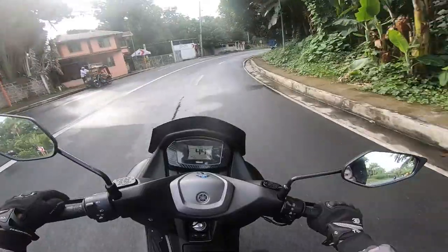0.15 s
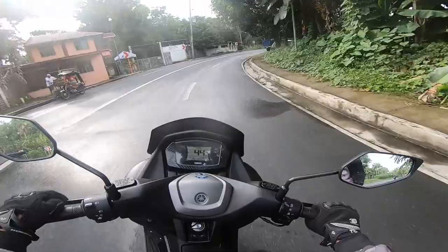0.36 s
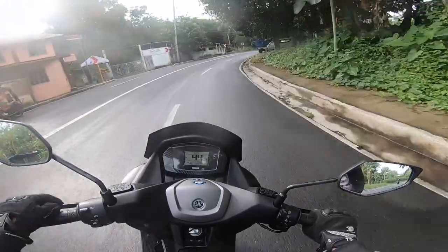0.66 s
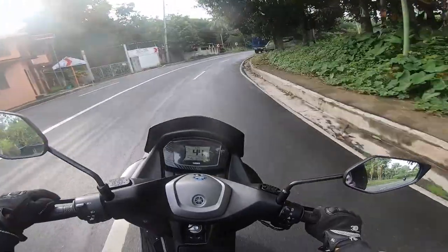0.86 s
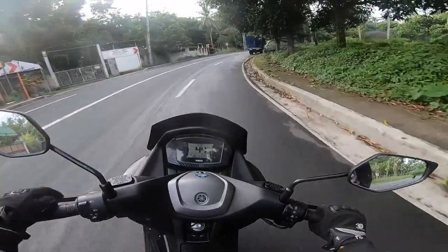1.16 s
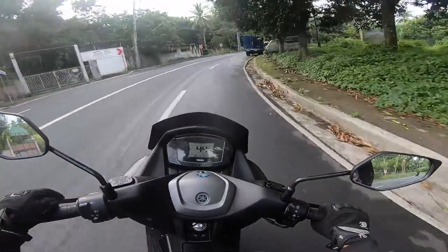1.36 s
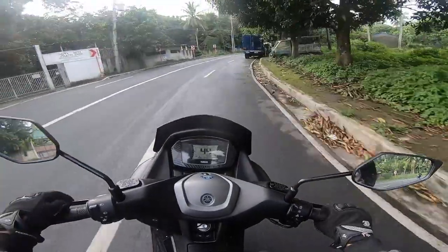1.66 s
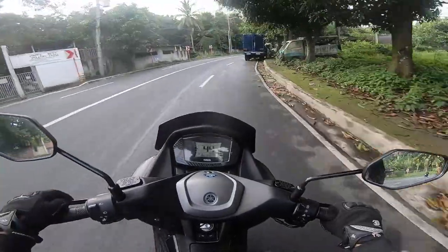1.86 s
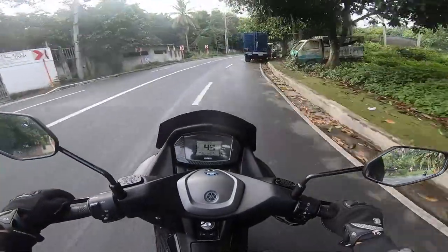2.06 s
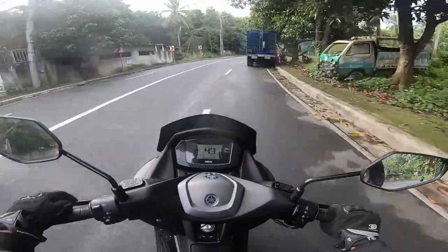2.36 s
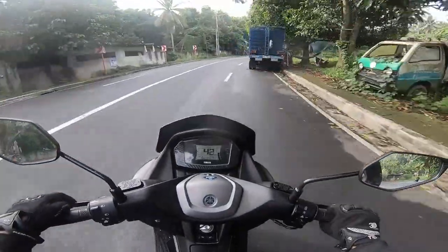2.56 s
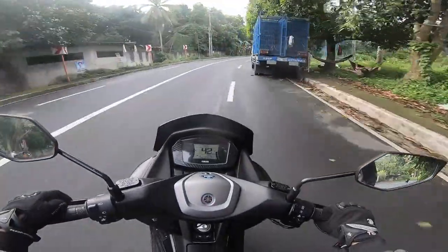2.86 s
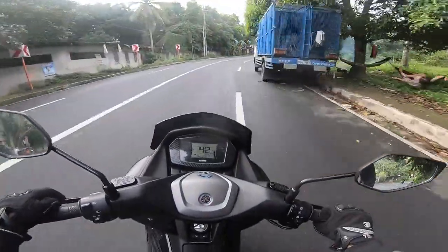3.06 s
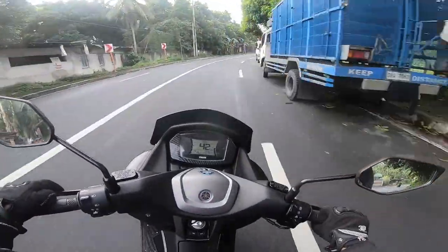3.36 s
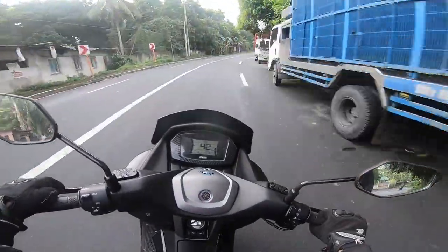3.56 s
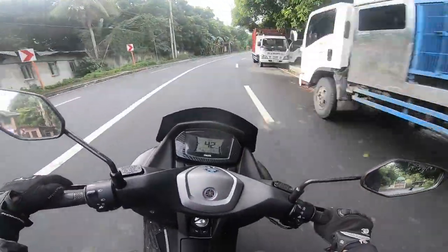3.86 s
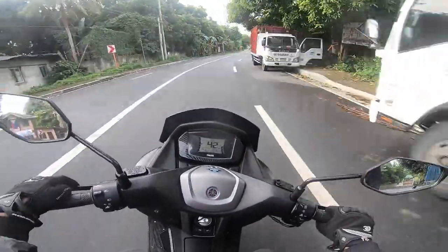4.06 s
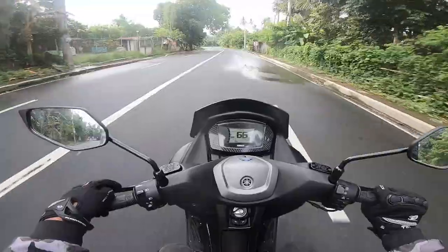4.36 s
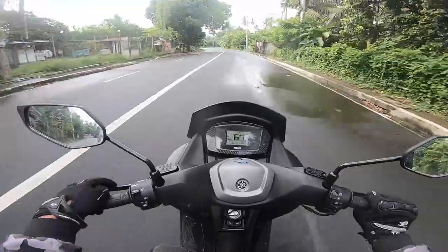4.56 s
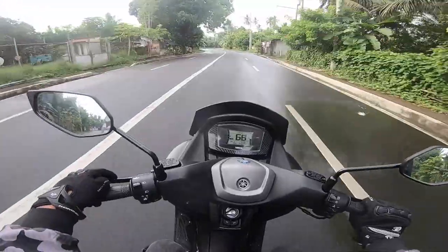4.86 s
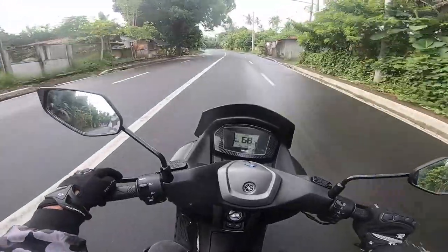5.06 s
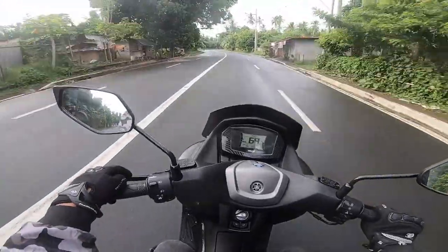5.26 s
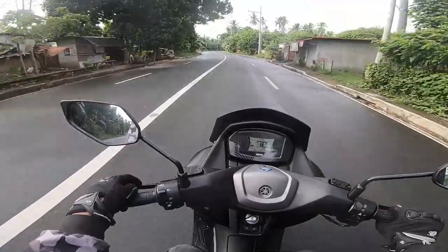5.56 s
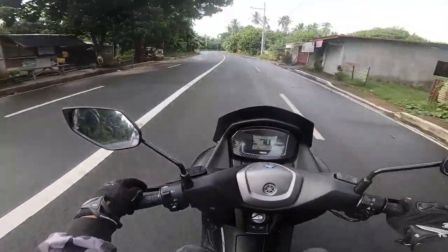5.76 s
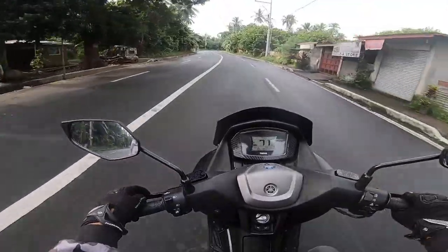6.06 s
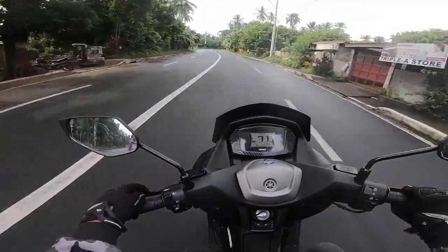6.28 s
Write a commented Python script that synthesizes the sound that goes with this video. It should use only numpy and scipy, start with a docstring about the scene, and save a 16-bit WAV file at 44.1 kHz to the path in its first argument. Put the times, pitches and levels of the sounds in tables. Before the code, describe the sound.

Heard from the rider's chest, a single-cylinder scooter cruises on a damp road: low buzzing drone, dull tyre roar and wind thumping the microphone. Faint ticks and a little spray come early, then four short bird whistles. A hollow whoosh marks a parked lorry going by, and the engine lifts slightly. A sharp click cuts to a faster stretch with higher drone, louder roar, airy hiss and heavy buffeting.

```python
"""A single-cylinder scooter on a damp road, heard from the rider's chest: drone, tyre roar, wind buffets.
Cruising: soft high ticks, spray on a wet patch at 0.8 s, four bird calls from 2.3 s, a parked lorry's
whoosh at 3.8 s, then slightly more throttle. At 4.35 s a click jumps to a faster, louder stretch;
its throttle eases from 5.7 s. The engine is a sum of harmonics of the firing rate, the bird is
gliding sines, and tyres, wind and air are shaped noise."""
import sys
import numpy as np
from scipy import signal
from scipy.fft import rfft, irfft, next_fast_len
from scipy.io import wavfile
from scipy.ndimage import uniform_filter1d

SR = 44100
rng = np.random.default_rng(int(sys.argv[2]) if len(sys.argv) > 2 else 0)


def wrap_up_sound(samples):
    """Save the sound to the file named by the first command line argument, as 16-bit audio."""
    columns = np.atleast_2d(samples).T
    # keep every value between -1 and 1, then stretch to whole-number steps
    tamed = np.clip(columns, -1, 1)
    steps = np.round(tamed * 32767).astype(np.int16)
    wavfile.write(sys.argv[1], SR, steps)


N = 283122
T = np.arange(N) / SR
JUMP_S = 4.3499
LORRY_S = 3.79


def undb(db):
    """Decibels to gain."""
    return 10 ** (np.asarray(db) / 20)


def curve(rows):
    """Join (t/s, value) rows by straight lines."""
    return np.interp(T, *np.transpose(rows))


def ramp(from_s, to_s):
    """Straight rise from 0 to 1 between two times."""
    return np.clip((T - from_s) / (to_s - from_s), 0, 1)


def swell(at_s, rise_s, fall_s):
    """Gaussian rise to 1 at at_s and Gaussian fall after; rise_s and fall_s are 1/e times."""
    return np.exp(-((T - at_s) / np.where(T < at_s, rise_s, fall_s)) ** 2)


def unit(x):
    """Scale to rms 1."""
    return x / np.sqrt(np.mean(x ** 2))


def walk(rate_hz):
    """Smooth random wandering of rms 1: noise low-passed at about rate_hz."""
    size = next_fast_len(N, real=True)
    hz = np.arange(size // 2 + 1) * SR / size
    spectrum = rfft(rng.standard_normal(size)) / (1 + (hz / rate_hz) ** 4)
    return unit(irfft(spectrum, size)[:N])


def colour(x, points):
    """Filter x by a response of (f/Hz, level/dB) points, linear over log frequency; rms 1."""
    hz, db = np.transpose(points)
    bins_hz = np.arange(N // 2 + 1) * SR / N + 1  # +1 avoids log(0)
    gain = undb(np.interp(np.log(bins_hz), np.log(hz), db))
    return unit(irfft(rfft(x) * gain, N))


def hiss(centre_hz, width_hz):
    """Noise in a bell-shaped band, rms 1."""
    bins_hz = np.arange(N // 2 + 1) * SR / N
    bell = np.exp(-((bins_hz - centre_hz) / width_hz) ** 2)
    return unit(irfft(rfft(rng.standard_normal(N)) * bell, N))


def engine(revs, cycles, orders, change, load_db, shimmer_db, rough, drift_turns):
    """Wavering firing-rate harmonics, lifted by resonances and shut in above an edge by the bodywork.

    change (0-1) moves each harmonic from its first level to its second.
    """
    # resonances of airbox and a body panel: centre f/Hz, width/Hz, extra gain at centre (ratio)
    resonance_rows = [(450, 37, 0.7), (1416, 30, 0.96)]
    body_edge_hz = 1566
    firing_hz = curve(revs)
    out = 0
    for order, first_db, second_db in orders:
        tone_hz = order * firing_hz
        db = first_db + change * (second_db - first_db) + shimmer_db * np.tanh(walk(4.4))
        lift = 1 + sum(gain / (1 + (2 * (tone_hz - centre_hz) / width_hz) ** 2)
                       for centre_hz, width_hz, gain in resonance_rows)
        shield = 1 / np.sqrt(1 + (tone_hz / body_edge_hz) ** 60)
        turns = order * cycles + rng.random() + drift_turns * walk(5)
        out = out + lift * shield * undb(db) * np.sin(2 * np.pi * turns)
    return out * undb(load_db) * (1 + rough * walk(40))


def crank(revs, wobble):
    """Running count of firing cycles; the speed wavers slightly under the belt drive."""
    return np.cumsum(curve(revs) * (1 + wobble * walk(9.5))) / SR


def throttle(revs):
    """Firing rate above its mean over the stretch, Hz."""
    hz = curve(revs)
    in_stretch = (T >= revs[0][0]) & (T <= revs[-1][0])
    return hz - hz[in_stretch].mean()


def road(cycles, roar_db, spectrum, firing_depth, turn_depth, flutter_db, clatter_hz=2000):
    """Tyre and air roar plus dull engine clatter that pulses at each firing and each crank turn."""
    # four-stroke: two crank turns per firing
    pulsing = firing_depth * np.cos(2 * np.pi * cycles) + turn_depth * np.cos(4 * np.pi * cycles)
    rush = rng.standard_normal(N) * undb(flutter_db * walk(25))
    bins_hz = np.arange(N // 2 + 1) * SR / N
    clatter = irfft(rfft(rush * pulsing) / (1 + (bins_hz / clatter_hz) ** 2), N)
    return colour(rush + clatter, spectrum) * undb(roar_db)


def spray(grain_db=3, centre_hz=6500, width_hz=2800):
    """Fine droplets thrown off the tyres on a wet patch: grainy high noise."""
    wet_s, wet_half_s, spray_db = 0.83, 0.31, -68.5
    droplets = unit(hiss(centre_hz, width_hz) * undb(grain_db * walk(300)))
    return droplets * undb(spray_db) * swell(wet_s, wet_half_s, wet_half_s)


def wind(gust_rows, flutter_rows):
    """Large eddies thump on the microphone with each gust; small ones keep up a dense flutter."""
    # large-eddy spectrum: f/Hz, relative level/dB per Hz
    rumble_spectrum = [(4, -15.5), (15, 1), (27, 1.5), (50, -3.5), (70, -12), (120, -27.5), (500, -71),
                       (5000, -140)]
    # small-eddy spectrum: f/Hz, relative level/dB per Hz
    flutter_spectrum = [(30, -25), (60, -3), (85, 0), (135, -5.5), (190, -10.5), (250, -13.5), (500, -40.5),
                        (1200, -34), (3000, -84.5), (8000, -120)]
    rumble = eddies(rumble_spectrum, even_s=0.12, lumpy_db=0.3) * undb(curve(gust_rows))
    flutter = eddies(flutter_spectrum, even_s=0.13, lumpy_db=1.0) * undb(curve(flutter_rows))
    return rumble + flutter


def eddies(spectrum, even_s, lumpy_db):
    """Eddies of varying strength as shaped noise, with power evened out over about even_s."""
    x = colour(rng.standard_normal(N) * undb(lumpy_db * np.tanh(walk(35))), spectrum)
    size = int(even_s * SR)
    power = uniform_filter1d(uniform_filter1d(x ** 2, size), size)
    return unit(x / np.sqrt(power))


def fairing(level_db=-45.0, centre_hz=2330, width_hz=470, full_s=4.9, gust_db=-0.5):
    """Air hisses over the fairing: band noise that builds up after the jump and swells gently."""
    level = undb(level_db + gust_db * np.tanh(walk(3.4)))
    return hiss(centre_hz, width_hz) * ramp(JUMP_S, full_s) * level


def lorry(centre_hz=815, width_hz=110, half_s=0.11, level_db=-40.5):
    """Brief hollow whoosh, a band of noise, as the side of the parked lorry goes by."""
    return hiss(centre_hz, width_hz) * undb(level_db) * swell(LORRY_S, half_s, half_s)


def bird(third_db=-13, bright_s=0.023, fourth_db=-29, second_ratio=1.253, second_at_s=0.064,
         second_half_s=0.026, waver=0.0041, tremble_db=1.0):
    """Whistles on the voice's second harmonic scoop up, sag and drop; the other syrinx side joins higher."""
    # calls: start t/s, length/s, attack/s, top pitch f/Hz, sag/Hz, final drop/Hz, mid-call lilt/Hz,
    # initial level/dB, second voice relative to first/dB
    call_rows = [(2.306, 0.128, 0.045, 3120, 170, 200, 2, -48.5, -35),
                 (2.556, 0.115, .02, 3280, 200, 330, 2, -46, -28),
                 (2.79, 0.12, 0.017, 3265, 60, 440, 63, -44.7, -13.5),
                 (3.041, 0.11, .014, 3240, 213, 230, 10, -45, -11.5)]
    release_s, fade_db_per_s = 0.023, 20
    scoop_hz, scoop_s, drop_s = 146.6, 0.019, 0.0354
    overshoot_hz, bump_s = 75, 0.013
    out = 0
    unsteady = 1 + waver * walk(124)
    for start_s, length_s, attack_s, top_hz, sag_hz, drop_hz, lilt_hz, db, second_db in call_rows:
        age = np.clip(T - start_s, 0, length_s)
        left = length_s - age
        envelope = np.minimum(age / attack_s, 1) * np.minimum(left / release_s, 1)
        envelope = envelope * undb(db - fade_db_per_s * age)

        scoop = scoop_hz * np.maximum(1 - age / scoop_s, 0)
        sag = sag_hz * (age - scoop_s) / length_s
        drop = drop_hz * np.maximum(1 - left / drop_s, 0)
        overshoot = overshoot_hz * swell(start_s + scoop_s, bump_s, bump_s)
        lilt = lilt_hz * swell(start_s + second_at_s, bump_s, bump_s)
        hz = top_hz - scoop - sag - drop + overshoot + lilt
        phase = 2 * np.pi * np.cumsum(hz * unsteady) / SR

        third = undb(third_db) * np.exp(-age / bright_s) * np.sin(3 * phase / 2)
        fourth = undb(fourth_db) * np.sin(2 * phase)
        voice = np.sin(phase) + third + fourth
        second_swell = swell(start_s + second_at_s, second_half_s, second_half_s)
        second = undb(second_db) * second_swell * np.sin(second_ratio * phase)
        out = out + np.sqrt(2) * envelope * (voice + second)  # sqrt(2): rms to peak
    return foliage(out * undb(tremble_db * walk(60)))


def foliage(x, scatter_db=-14, decay_s=0.099):
    """Roadside trees scatter a short, faint tail: convolution with decaying noise."""
    age = T[:SR // 2]
    tail = rng.standard_normal(len(age)) * np.exp(-age / decay_s)
    return x + undb(scatter_db) * signal.fftconvolve(x, tail / np.linalg.norm(tail))[:N]


def ticks(length_s=0.009, width_hz=650):
    """Brief, soft bursts of high band noise."""
    # ticks: t/s, centre f/Hz, level/dB
    tick_rows = [(.288, 4300, -58), (.75, 4500, -59), (1.335, 4750, -61), (1.865, 4900, -61.5),
                 (2.3, 4700, -60), (2.748, 4150, -59)]
    return sum(hiss(hz, width_hz) * undb(db) * swell(at_s, length_s, length_s)
               for at_s, hz, db in tick_rows)


def click(size_db=-11, decay_s=0.0011):
    """Abrupt negative pressure step at the jump, decaying exponentially."""
    return -undb(size_db) * (T >= JUMP_S) * np.exp(-np.abs(T - JUMP_S) / decay_s)


def cruising():
    """Light throttle; the lorry's side lifts engine and tyres a little and recolours the drone."""
    # engine speed: t/s, firing rate f/Hz
    cruise_revs = [(0.06, 39.7), (0.58, 39.75), (0.84, 40.05), (0.91, 40.5), (1.2, 40.95), (1.41, 40.95),
                   (1.8, 40.45), (2.32, 39.68), (2.49, 39.8), (2.61, 40.6), (2.93, 40.7), (3.03, 40.1),
                   (3.2, 39.55), (3.33, 39.55), (3.43, 40.0), (3.73, 40.35), (3.95, 42.25), (4.3, 42.4)]
    # engine tones: multiple of firing rate, relative level before/dB, from the lorry onward/dB
    cruise_orders = [(2, -41, -42), (3, -42.5, -47.5), (4, -39, -39), (6, -46.5, -49.5), (7, -53, -47.5),
                     (8, -45.5, -51), (9, -43.5, -45.5), (10, -44, -39.5), (11, -44, -43.5),
                     (12, -52.5, -47), (13, -44.5, -56), (14, -50.5, -47), (15, -49.5, -50), (16, -48, -50),
                     (18, -59, -55), (20, -57, -53), (21, -62, -52.5), (22, -61, -55), (23, -59.5, -65),
                     (24, -68, -56), (27, -54.5, -51.5), (29, -55, -51.5), (31, -52, -50), (33, -58, -55.5),
                     (35, -57, -61), (38, -55, -51), (39, -57.5, -51)]
    # tyre and air spectrum: f/Hz, relative level/dB per Hz
    cruise_spectrum = [(100, -6), (250, -1.1), (370, -2), (480, 0), (580, -2), (760, -5.3), (1000, -8),
                       (1480, -7), (1780, -17.5), (2450, -21.5), (2950, -28.5), (4000, -32.5), (6000, -38),
                       (7000, -45), (11000, -52.5), (15500, -55)]
    # gusts: t/s, rumble level/dB
    cruise_gusts = [(0, -27.5), (.28, -22), (.42, -20.5), (.55, -26.5), (.7, -21.5), (1.15, -20),
                    (1.38, -23.5), (1.58, -20), (1.8, -29.5), (1.95, -20.5), (2.35, -24), (2.62, -23),
                    (2.88, -20), (3.02, -26), (3.5, -26.5), (3.73, -30), (4.02, -20), (4.3, -29)]
    # small eddies: t/s, flutter level/dB
    cruise_flutter = [(0, -31), (.8, -28), (1.5, -30.5), (2.5, -30), (3.1, -31), (4.3, -31)]
    approach_s, retreat_s = 0.049, 0.97
    cycles = crank(cruise_revs, wobble=0.00244)
    push_hz = throttle(cruise_revs)
    beside = swell(LORRY_S, approach_s, retreat_s)
    # throttle raises revs and loudness together: dB per Hz of firing rate
    engine_db = 3 + 0.77 * push_hz + 2 * beside
    roar_db = -34.5 + 0.13 * push_hz + 0.9 * beside
    recolour = ramp(LORRY_S - 2 * approach_s, LORRY_S)
    drone = engine(cruise_revs, cycles, cruise_orders, recolour, engine_db,
                   shimmer_db=2.4, rough=0.18, drift_turns=0.031)
    tyres = road(cycles, roar_db, cruise_spectrum, firing_depth=0.092, turn_depth=0.059, flutter_db=-0.1)
    buffets = wind(cruise_gusts, cruise_flutter)
    return drone + tyres + buffets + lorry() + spray() + ticks() + bird()


def speeding(roar_rise_db_per_s=0.4):
    """Faster stretch: the roar grows steadily; the drone changes colour as the throttle eases."""
    # engine speed: t/s, firing rate f/Hz
    fast_revs = [(4.36, 56.6), (5.21, 57.3), (5.62, 57.2), (6.01, 56.2), (6.37, 55.5)]
    # engine tones: multiple of firing rate, relative level on open throttle/dB, on eased throttle/dB
    fast_orders = [(1, -25.5, -22), (2, -27, -26), (3, -39, -35.5), (4, -32.5, -35.5), (5, -41, -36.5),
                   (6, -42.5, -45.5), (7, -34.5, -34), (8, -30.5, -34), (9, -45, -35.5), (10, -33, -37.5),
                   (11, -53, -38.5), (12, -43, -38.5), (14, -42.5, -47), (15, -45, -52), (16, -46, -57),
                   (17, -56, -45.5), (18, -45.5, -44), (19, -53, -50), (20, -46, -47), (21, -51, -44),
                   (22, -46, -46), (23, -42, -43), (24, -41, -54), (25, -47.5, -49), (26, -44, -43),
                   (27, -37, -41), (28, -50, -43)]
    # tyre and air spectrum: f/Hz, relative level/dB per Hz
    fast_spectrum = [(100, -4), (205, 0), (255, 8.5), (310, 4), (480, 1.5), (650, 1.8), (850, -3.5),
                     (1520, -6.5), (1720, -9.5), (2550, -11), (2950, -21.5), (3700, -22), (5900, -27.5),
                     (8000, -37), (11000, -53.5), (15500, -61)]
    # gusts: t/s, rumble level/dB
    fast_gusts = [(4.35, -18.5), (4.49, -11), (4.6, -21), (4.7, -11), (4.8, -12.5), (4.9, -17.5),
                  (5.2, -14.5), (5.3, -15), (5.52, -16.5), (5.64, -11.5), (5.76, -16), (6.12, -17),
                  (6.4, -12.5)]
    # small eddies: t/s, flutter level/dB
    fast_flutter = [(4.38, -19), (4.52, -24.5), (4.72, -23.5), (4.85, -25), (5.08, -24), (5.45, -23.5),
                    (5.6, -17.5), (5.76, -24.5), (5.9, -20), (6.4, -22)]
    ease_from_s, ease_to_s = 5.73, 6.01
    cycles = crank(fast_revs, wobble=0.0015)
    drone = engine(fast_revs, cycles, fast_orders, ramp(ease_from_s, ease_to_s), load_db=2.5,
                   shimmer_db=2.2, rough=0.076, drift_turns=0.012)
    middle_s = (JUMP_S + T[-1]) / 2
    roar_db = -26 + roar_rise_db_per_s * (T - middle_s)
    tyres = road(cycles, roar_db, fast_spectrum, firing_depth=0.11, turn_depth=0.098, flutter_db=0.36)
    return drone + tyres + fairing() + wind(fast_gusts, fast_flutter)


def scene():
    """One stretch of road gives way to the other within a millisecond, with a click."""
    fast = ramp(JUMP_S, JUMP_S + 0.001)
    return ((1 - fast) * cruising() + fast * speeding() + click())[None]


def record(dry):
    """The camera rounds the strongest gusts (tanh) and cuts the top (steep elliptic low-pass)."""
    top_hz = 15700
    rounded = 2 * np.tanh(dry / 2)
    # order 8, 0.2 dB ripple, 70 dB stopband
    lowpass = signal.ellip(8, 0.2, 70, top_hz, fs=SR, output="sos")
    return signal.sosfilt(lowpass, rounded)


dry = scene()
out = record(dry)
wrap_up_sound(out)
```